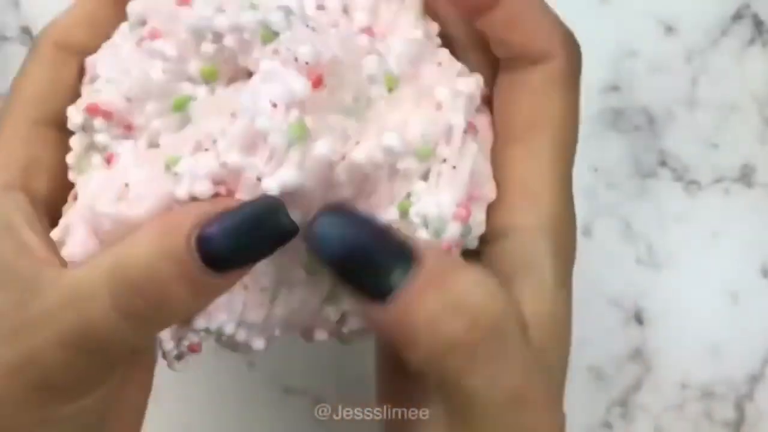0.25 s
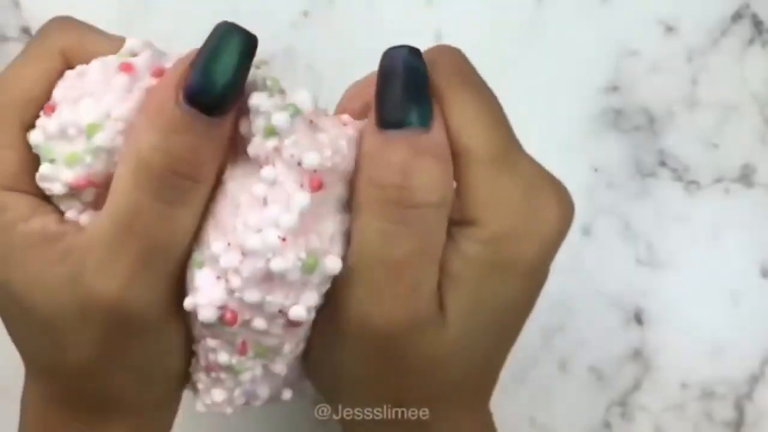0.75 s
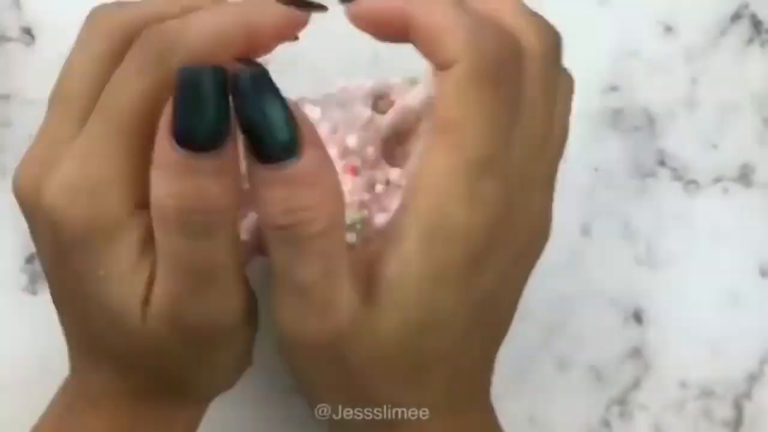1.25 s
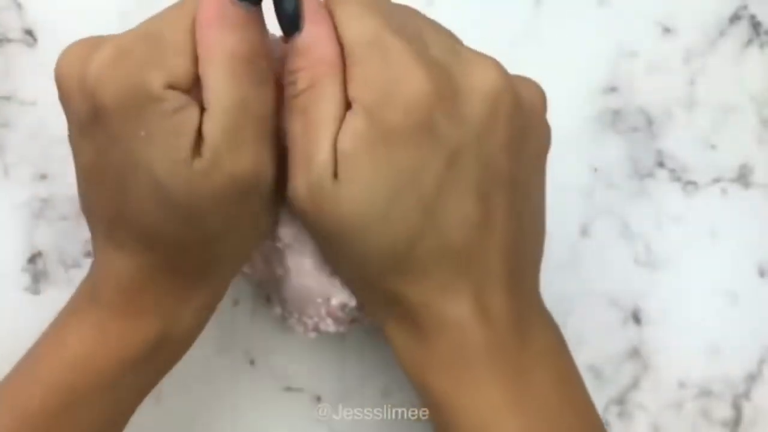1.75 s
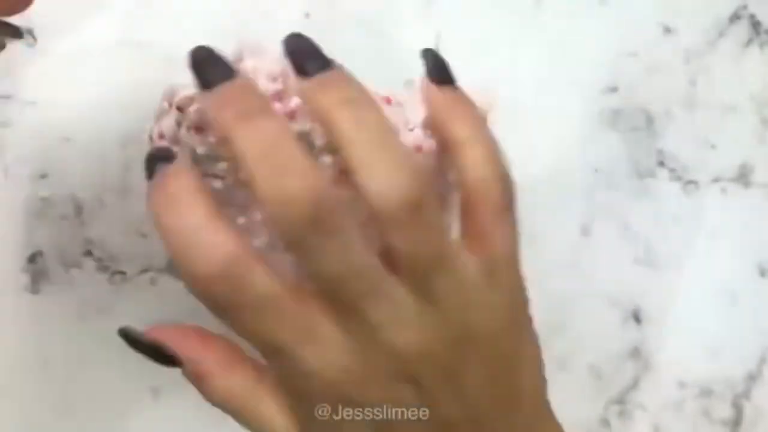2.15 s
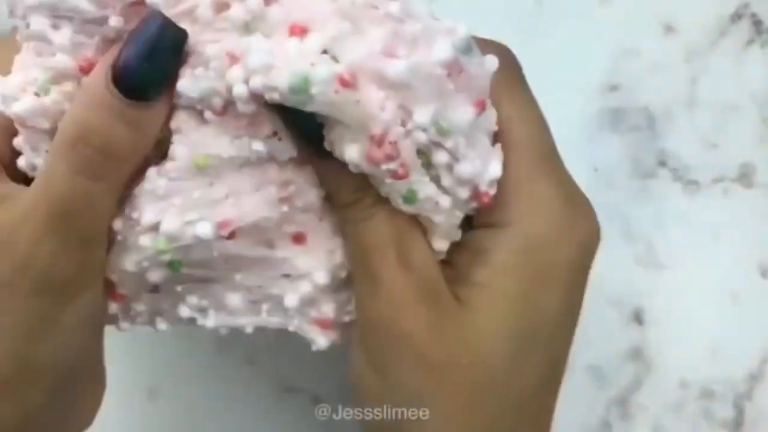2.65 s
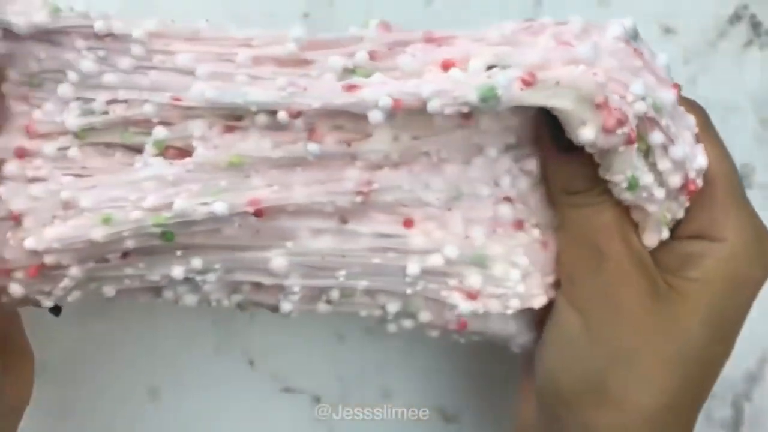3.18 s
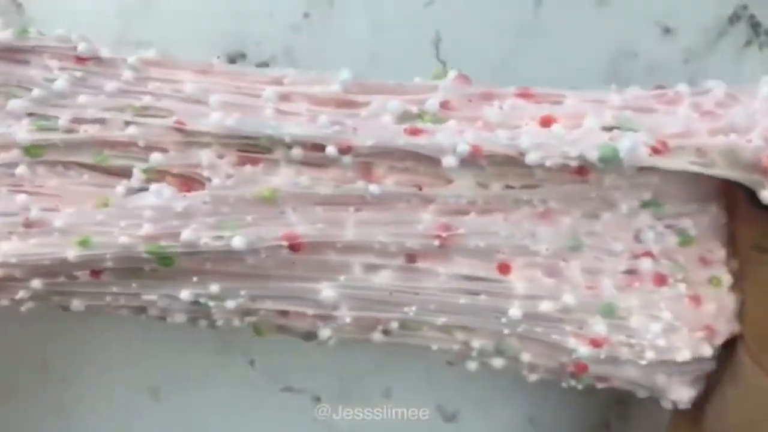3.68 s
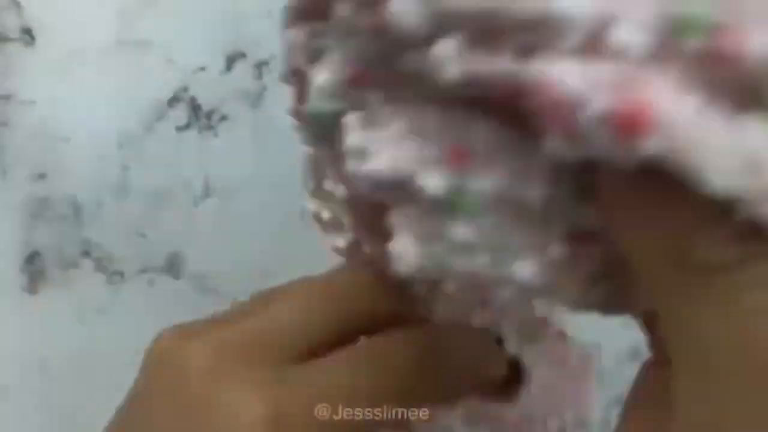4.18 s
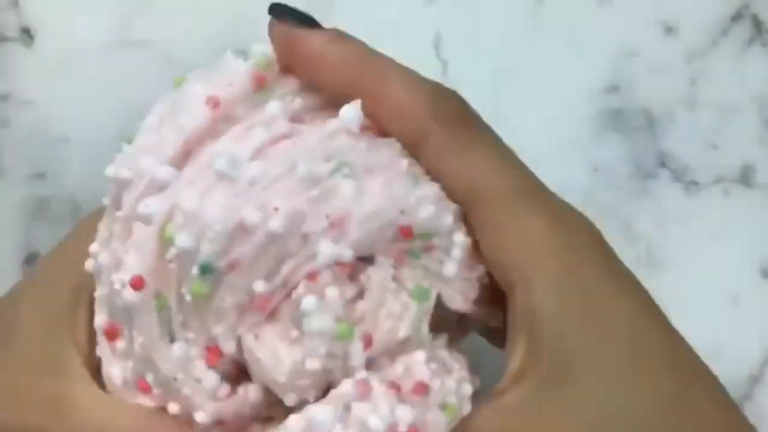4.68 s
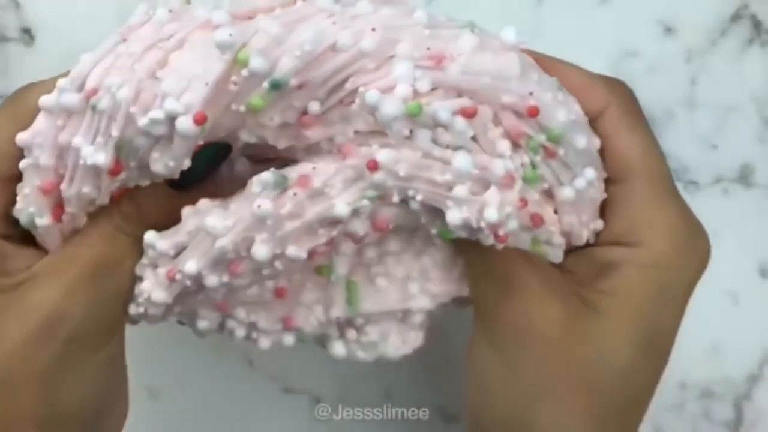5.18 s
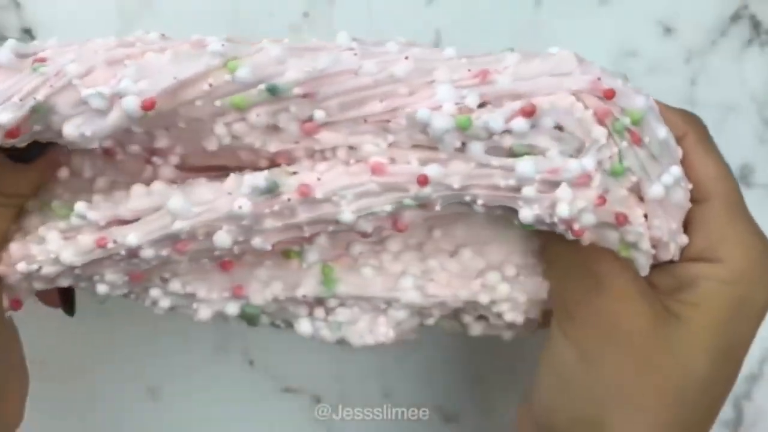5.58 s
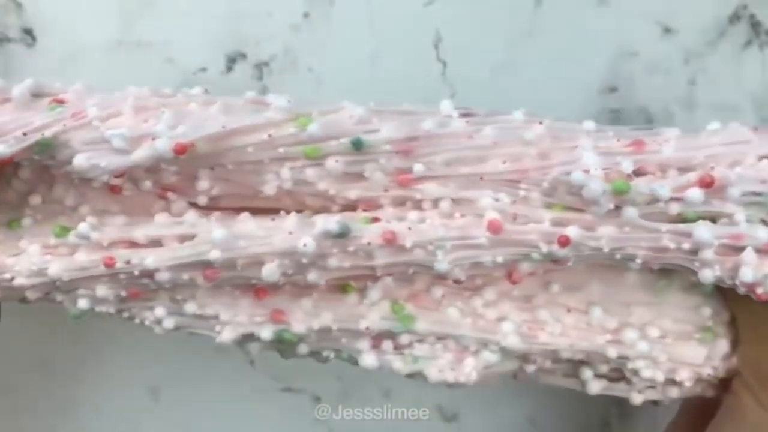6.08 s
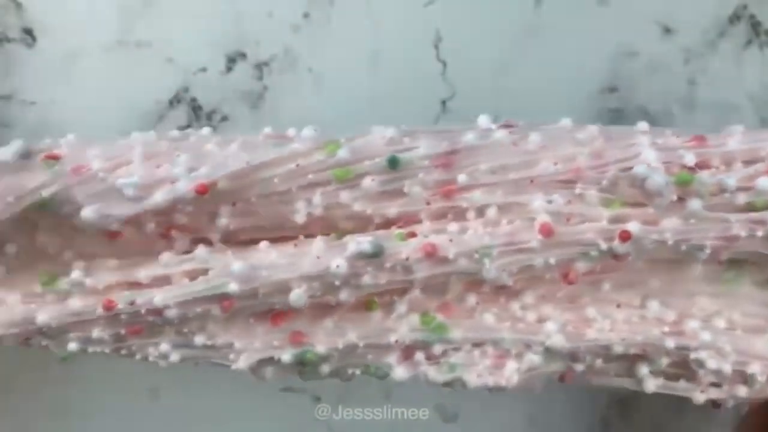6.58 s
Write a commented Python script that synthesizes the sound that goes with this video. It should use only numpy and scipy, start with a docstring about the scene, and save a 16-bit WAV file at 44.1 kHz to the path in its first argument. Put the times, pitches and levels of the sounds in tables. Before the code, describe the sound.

Hands squeeze and stretch bead-filled slime close up: sharp crunchy pops, dense fine crackling and wet squelches, in a quiet room with faint rumble.

```python
"""Squeezing beaded slime

Two hands squeeze, fold and stretch slime full of small foam beads close to a microphone.
Air pockets burst: a pitched crack, a short tearing of lumpy noise and a hollow pop of rising pitch.
Between them, many tiny ringing grains and filtered noise make crackle, squelch and the hands' push.
A hard table and a quiet room answer the bursts; one soft thud, low rumble and faint hiss join in."""
import sys
import numpy as np
from scipy import signal
from scipy.fft import rfft, irfft
from scipy.io import wavfile
from scipy.ndimage import uniform_filter1d

SR = 44100
rng = np.random.default_rng(int(sys.argv[2]) if len(sys.argv) > 2 else 0)


def inscribe(sig):
    """Save sig as 16-bit PCM at rate SR to the path in sys.argv[1].

    A 1-D sig is mono; a 2-D sig holds one channel per row.
    Samples are clipped to [-1, 1] before scaling.
    """
    pcm = np.round(np.clip(np.atleast_2d(sig).T, -1, 1) * 32767)
    wavfile.write(sys.argv[1], SR, pcm.astype(np.int16))


N = 301644   # length in samples


def from_db(db):
    """Decibels to gain."""
    return 10 ** (np.asarray(db) / 20)


def rms_one(x):
    """Scale to an rms (average strength) of one."""
    return x / np.sqrt(np.mean(x ** 2, axis=-1, keepdims=True) + 1e-20)


def dying(t, t60):
    """Exponential decay, 60 dB down at t60."""
    return from_db(-60 * t / t60)


def colour(x, spectrum):
    """Filter without pre-echo (minimum phase), its gain drawn as f/Hz, level/dB points."""
    hz, db = np.transpose(spectrum)
    grid = np.maximum(np.fft.rfftfreq(8192, 1 / SR), 1)
    gain_db = np.interp(np.log(grid), np.log(hz), db)
    # folding the cepstrum to positive times puts the whole response after the input
    cepstrum = irfft(np.log(from_db(gain_db)))
    cepstrum[1:4096] *= 2
    cepstrum[4097:] = 0
    response = irfft(np.exp(rfft(cepstrum)))
    return signal.fftconvolve(x, response)[:N]


def noise(spectrum):
    """Steady coloured noise with an rms of one."""
    return rms_one(colour(rng.standard_normal(N), spectrum))


def drift(rate):
    """Slow random wander with an rms of one; a higher rate in Hz wanders faster."""
    r = np.exp(-2 * np.pi * rate / SR)
    wander = signal.lfilter([1], [1, -2 * r, r * r], rng.standard_normal(N + SR))
    return rms_one(wander[SR:])   # the first second lets the filter settle


def grains(per_s, spread_db, low_hz, high_hz, cycles):
    """Random snaps of uneven size, in clumps, each ringing a few cycles at one of 16 pitches."""
    sizes = from_db(spread_db * np.minimum(rng.exponential(1, N), 4.0)) * rng.choice([-1, 1], N)
    clumped_rate = per_s * from_db(4.0 * drift(40.))
    clicks = sizes * (rng.random(N) < clumped_rate / SR)
    dealt, out = rng.integers(0, 16, N), 0
    for k, hz in enumerate(np.geomspace(low_hz, high_hz, 16)):
        r, w = from_db(-60 * hz / cycles / SR), 2 * np.pi * hz / SR
        ring = signal.lfilter([np.sin(w)], [1, -2 * r * np.cos(w), r * r], clicks * (dealt == k) + 1e-18)
        out = out + np.sqrt(1 - r * r) * ring
    return rms_one(out)


# Tone of the building's rumble: columns [f/Hz, level/dB]
RUMBLE_TONE = [(13, -60), (22, -20), (36, -5), (53, 4), (67, 0), (81, -7), (146, -9.5), (258, -14),
               (288, -14), (318, -17), (600, -38.5), (780, -48), (1320, -120)]
# Tone of the hiss: columns [f/Hz, level/dB]
HISS_TONE = [(300, -25.5), (600, 15), (2000, 1.5), (8000, -43), (13400, -16), (14300, -45)]
RUMBLE_DB, HISS_DB = -41.5, -59.5   # rms levels before the overall tone


def background():
    """Low rumble of the building and a faint hiss, both steady coloured noise."""
    rumble = from_db(RUMBLE_DB) * noise(RUMBLE_TONE)
    hiss = from_db(HISS_DB) * noise(HISS_TONE)
    return rumble + hiss


# Kneading effort: columns [t/s, fine crackle level/dB, wet squelch level/dB]
KNEADING_EFFORT = [(0,-42.5,-43),(.06,-62,-64),(.11,-54,-53),(.17,-52.5,-56),(.4,-41,-47),(.53,-49,-57),(.61,-36.5,-49),(.7,-49,-51),(.74,-37.5,-41),(.86,-27.5,-37),(.99,-29,-44),(1.07,-54,-45),(1.29,-41,-39.5),(1.35,-46.5,-47.5),(1.52,-56,-55),(1.58,-41,-40),(1.7,-28.5,-39),(1.75,-36,-36),(1.79,-42,-35.5),(1.83,-41,-42),(1.88,-35.5,-42.5),(2.03,-48.5,-53),(2.25,-56,-56),(2.4,-54,-73),(2.48,-45.5,-44),(2.67,-41,-47.5),(2.76,-36,-45),(2.84,-41,-45.5),(2.98,-36,-42),(3.24,-42.5,-46),(3.38,-37,-40),(3.45,-41.5,-48),(3.68,-39,-46.5),(3.799,-44,-50),(4.08,-39,-45.5),(4.13,-46.5,-57),(4.45,-50.5,-51.5),(4.62,-39.5,-44),(4.76,-53,-53.5),(4.96,-36.5,-40),(5.13,-32.5,-34),(5.31,-38.5,-42),(5.49,-37.5,-40),(5.9,-43,-47.5),(6.27,-45,-42.5),(6.63,-47.5,-54),(6.68,-57,-61),(6.76,-59,-67),(6.84,-45,-48.5)]


def effort(s):
    """Crackle and squelch levels in dB at the given times, on straight lines between the points."""
    at, *columns = np.transpose(KNEADING_EFFORT)
    return [np.interp(s, at, c) for c in columns]


# Tone of the kneaded lump: columns [f/Hz, level/dB]
LUMP_TONE = [(350, -18.5), (550, -4), (1050, -0.5), (1300, -3), (1500, -4.5), (1650, -2.5), (2300, -2.5),
             (3200, -10)]
# Tone of the stretched strands: columns [f/Hz, level/dB]
STRAND_TONE = [(350, -21), (600, -10.5), (1050, -5.5), (1350, 1), (1650, -4.5), (2300, -1), (3200, -8.5)]
STRETCH_FROM_S = 2.7   # from here the slime is pulled into strands, whose squelch rings hollow


def wet(x):
    """Tone of the wet mass: a kneaded lump first, stretched strands later."""
    stretched = np.arange(N) / SR > STRETCH_FROM_S
    return np.where(stretched, rms_one(colour(x, STRAND_TONE)), rms_one(colour(x, LUMP_TONE)))


# Tone of the fine crackle: columns [f/Hz, level/dB]
CRACKLE_TONE = [(1500, -20), (2400, -8), (3600, 2), (5200, 2.5), (8700, 4.5), (11000, 0.5), (13400, 2.5),
                (14000, -37), (14500, -46)]
# Tone of the pushing hands: columns [f/Hz, level/dB]
PUSH_TONE = [(80, -27), (160, 0), (260, -2.5), (450, -7.5), (800, -18)]
GRAINY = 0.49   # share of crackle and squelch power in separate grains, the rest is smooth
LULL_DB, LULLS_HZ = 2., 13.5   # the crackle comes in clusters: rms swing, wander rate
PUSH_DB, PUSH_FOLLOWS = -51, 0.15   # push at mean effort; dB per dB of the crackle's swing
PUSH_WANDER_DB = 3.   # rms swing as the grip shifts slowly


def kneading():
    """Crackle of small films over smooth fizz, duller squelch of the wet mass, low push of the hands."""
    crackle_db, squelch_db = effort(np.arange(N) / SR)
    slide_fizz, slide_ooze, slide_push = sliding()
    snaps = rms_one(colour(grains(900., 5.4, 1950.0, 12300.0, 5.3), CRACKLE_TONE))
    fizz = noise(CRACKLE_TONE) * from_db(0.99 * drift(38.0))
    bubbles = wet(grains(700., 1.8, 343.0, 2790.0, 9.2))
    ooze = wet(rng.standard_normal(N))
    push = noise(PUSH_TONE)
    crackle, squelch = from_db([crackle_db, squelch_db] + LULL_DB * drift(LULLS_HZ))
    grain = np.sqrt(GRAINY) * (crackle * snaps + squelch * bubbles)
    # independent noises add by power, so gains are squared before they are summed
    fizz = fizz * np.sqrt((1 - GRAINY) * crackle ** 2 + slide_fizz ** 2 + after_fizz() ** 2)
    ooze = ooze * np.sqrt((1 - GRAINY) * squelch ** 2 + slide_ooze ** 2)
    effort_swing_db = crackle_db - crackle_db.mean()
    push_db = PUSH_DB + PUSH_FOLLOWS * effort_swing_db + PUSH_WANDER_DB * drift(2.8)
    push = push * (from_db(push_db) + slide_push)
    return grain + fizz + ooze + push


# Palms sliding over the mass: columns
# [full strength from t/s, swell t/s, hold t/s, fizz level/dB, ooze level/dB, push level/dB]
PALM_SLIDES = [(0.06,0.039,0.09,-65,-65,-51.5),(0.295,0.022,0.032,-34,-37,-43),(1.206,0.067,0.03,-25.5,-36.5,-32),(2.099,.03,0.098,-30,-36,-32),(2.97,0.086,0.11,-41,-50,-45),(4.212,0.12,.02,-39.5,-40.5,-53)]


def sliding():
    """Fizz, ooze and push gains of the sliding palms: swell, hold, then fall as long as the swell."""
    t, out = np.arange(N) / SR, 0
    for s, swell, hold, *db in PALM_SLIDES:
        shape = np.interp(t, [s - swell, s, s + hold, s + hold + swell], [0, 1, 1, 0])
        out = out + from_db(db)[:, None] * shape
    return out


RANDOM_PER_S, RANDOM_SPREAD_DB = 55., 4   # mean rate; spread of crack and cavity levels either way
RANDOM_OVER_DB, RANDOM_CAVITY_DB = 10.5, 3   # crack setting over the crackle, cavity over the squelch
RANDOM_CRACK_HZ, RANDOM_CAVITY_HZ = 6800, 1400   # middle pitches
RANDOM_TEAR_DB = -13.5   # middle tearing setting against the crack


def random_pops():
    """More pockets burst at random times throughout, following the kneading effort."""
    chance = rng.uniform(-1, 1, (500, 5))
    s = .01 + np.cumsum(rng.exponential(1, 500)) / RANDOM_PER_S
    crackle_db, squelch_db = effort(s)
    crack_db = crackle_db + RANDOM_OVER_DB + RANDOM_SPREAD_DB * chance[:, 0]
    crack_hz = RANDOM_CRACK_HZ * 2 ** (0.32 * chance[:, 1])
    tear_db = RANDOM_TEAR_DB + 8.5 * chance[:, 2]
    cavity_hz = RANDOM_CAVITY_HZ * 2 ** (1.37 * chance[:, 3] ** 3)
    cavity_db = squelch_db + RANDOM_CAVITY_DB + RANDOM_SPREAD_DB * chance[:, 4]
    rows = [s, crack_db, crack_hz, tear_db, cavity_hz, cavity_db]
    return np.transpose(rows)[s < N / SR]


# Bursting pockets placed one by one, faint to loud, levels before the trims in pops(): columns
# [t/s, crack level/dB, crack f/Hz, tearing against crack level/dB, cavity starting f/Hz, cavity level/dB]
PLACED_POPS = [(0.0536,-23.5,6960,-17,272,-53),(.1176,-23,6400,-17,340,-49),(.1213,-21,8700,-28,293,-53),(0.1536,-8.5,10500,-29,3350,-44),(.1913,-14,8700,-22,470,-59),(0.2138,-2,5700,-14.5,3760,-27),(.2237,-22,6900,-30,1060,-28.5),(.288,-21,5600,-11,1670,-31.5),(.3416,-8.5,8000,-24,714,-56),(.382,-18,6200,-5,3580,-47),(0.3916,-4,7400,-22,730,-38),(0.4059,-0.5,8700,-16,614,-38),(0.4235,-6,8550,-33,560,-41),(0.4742,-20.5,7000,-9.5,250,-47),(.4661,-24,7300,-26,770,-55),(0.5271,-16.5,7500,-12,980,-36),(.551,-23.5,4950,-6.5,955,-26),(.56,-26,7100,-6,350,-47),(0.621,-32,4800,-20,3580,-33),(0.6698,0.5,6230,-19,2600,-30),(0.7103,-8.5,8600,-17,2900,-28),(.713,-21,5500,-10,700,-29.5),(.745,-10,5470,-6,920,-22.5),(.772,-19,7000,-22,1110,-41),(0.7849,-1,5150,-9,550,-25),(0.793,-9,7600,-24,980,-34),(.8125,-14,6600,-17,2230,-29),(0.8235,-6,5460,-7.5,920,-32),(0.839,1,5860,-13.5,3540,-28),(.8469,1.5,6800,-20,3590,-28),(0.8565,7,6300,-16,3740,-23),(.86,3.5,6200,-10,1026,-5),(.8667,-10,4280,-15,1460,-29),(.8765,2.5,9400,-19,950,-41),(.8969,-9,6800,-21,960,-40),(.902,-6,7400,-28,350,-33),(0.9089,-11,6700,-4.5,900,-30),(0.9261,7.5,9000,-15,2490,-41),(0.9386,-9,8150,-10,794,-23),(0.9418,0.5,8400,-5,1170,-33),(.962,-6,8850,-21,1300,-35),(0.968,-5.5,5000,-9.5,744,-17.5),(.9772,-15,5700,-20,940,-31),(0.9869,-1.5,7150,-2.5,900,-21),(0.9975,-10,7100,-16,1140,-37),(1.0131,-23,5000,-20,900,-16.5),(1.0179,-2,7300,-5,625,-19),(1.054,-14.5,7300,-5,1360,-26.5),(1.0651,-4,8600,-21,1070,-44),(1.091,5,8260,-9,497,-19),(1.17,-10,7500,-20,545,-30),(1.2906,-15.5,4300,-14,715,-32.5),(1.3033,-22,7000,-8,387,-37),(1.342,-25.5,5870,-24,770,-45),(1.4566,-4.5,8500,-17.5,3620,-24),(1.477,-24,7000,-9,256,-42),(1.5353,-29,5500,-19.5,1320,-30),(1.551,-20,4600,-17,1160,-25),(1.555,-17,8600,-11,720,-40),(1.5658,-6.5,7650,-13,1170,-9),(1.5763,-2,8100,-7.5,2600,-26),(1.5981,-13,5500,-17,2610,-19),(1.61,-3,6400,-11,2820,-26),(1.6402,-9.5,7200,-6,1090,-34),(1.6487,-11,7100,-15,1200,-43),(1.6522,-21,7600,-20,660,-31.5),(1.6727,2,7200,-15,1000,-39),(1.7035,1,7000,-10,900,-19),(1.7072,-6.5,7100,-4.5,1270,-22),(1.7171,-26,7100,-20,497,-22),(1.723,-9,7700,-23,550,-36),(1.7456,-18,6700,-16,684,-27),(1.7533,-10,7800,-12,680,-43),(1.7691,-19,7100,-20,416,-27),(1.7778,-18,7300,-8,470,-30),(1.798,-18,5800,-35,1960,-29),(1.8161,-8.5,7300,-25,850,-24),(1.8405,-10,6300,-18,640,-52),(1.8543,0,6200,-11,2110,-51),(1.875,-7,8200,-17,1070,-25),(1.895,-9,6640,-9,3060,-50),(1.9082,-10,8400,-26,370,-50),(1.9349,-18.5,6140,-4.5,2200,-25),(1.9541,-16,6400,-16.5,825,-37),(1.9866,-25.5,6200,-3,1170,-34),(2.06,-18.5,7000,-14,770,-42),(2.0832,-11.5,6800,-7,965,-23),(2.1304,-11.5,7200,-10.5,1260,-24),(2.1624,-11.5,6840,-8.5,794,-23),(2.199,-14.5,6400,-6,930,-39),(2.3686,-21.5,7760,-21,320,-44),(2.3938,-24.5,6540,-25,270,-64),(2.4637,-7,8500,-13.5,930,-34),(2.4787,-25,5900,-11,1810,-29),(2.5028,-15.5,8450,-28,442,-42),(2.5614,-38,4200,-17,3080,-21.5),(2.569,-22.5,5750,-3.5,640,-37),(2.632,-22,6960,-6,1040,-36),(2.6984,-21,7000,-8,2400,-43),(2.7026,-0.5,6340,-11,2360,-24),(2.7045,-3,7450,-12,3000,-33),(2.7051,-3,8600,-0.5,3430,-35),(2.796,-25.5,6700,-32,1320,-42),(2.8581,-27,6200,-18,1330,-45),(2.8683,-11,8800,-29,2670,-30),(2.9032,-8.5,7200,-40,1240,-25.5),(2.9068,-16.5,6660,-10,1070,-38),(2.9246,-19,6200,-24,1180,-42),(2.935,-16,6600,-25,1470,-35),(3.0263,-23,8000,-13,330,-48),(3.0814,-18.5,8400,-22,2640,-33),(3.092,-13,7560,-16,1270,-38),(3.1564,-14.5,2820,-13.5,1450,-26),(3.2013,-5,10400,-34,1210,-49),(3.2579,-18.5,7940,-19,350,-59),(3.2907,-2,7700,-16,1170,-32),(3.3297,-16,8600,-23,1650,-43),(3.3513,-23,5800,-15,3430,-31),(3.3802,-20,8600,-15,850,-46),(3.419,-39,8000,-11,1520,-30),(3.4327,-21.5,5500,-30,3040,-41),(3.46,-23,6200,-21,1500,-51),(3.472,-18,6030,-21,710,-54),(3.537,-16.5,7940,-21,250,-73),(3.5704,-9.5,5170,-17,1420,-37),(3.6585,-15.5,6400,-27,2130,-28),(3.6862,-20,6700,-3.5,1320,-36),(3.7681,-15,6060,-23,865,-39),(3.7912,-17.5,5500,-12,2050,-41),(3.9132,-11,7050,-20,3450,-38),(3.925,-24,5400,-11,1540,-25.5),(3.9866,-22.5,7600,-14,2200,-50),(3.9963,-20,7000,-18,240,-51),(4.0322,-21,5430,-34,2030,-34),(4.075,-15.5,7300,-8,1030,-32),(4.3616,-14,2200,-18,1400,-15.5),(4.362,-13,6000,-15,2580,-30),(4.5247,-7,7040,-15,1350,-19.5),(4.551,-34,6600,-20,874,-31.5),(4.562,-19.5,7300,-21,1790,-37),(4.6103,-23,6300,-6,427,-38.5),(4.6201,-13,8340,-16,2380,-30),(4.692,-21.5,8100,-6.5,1080,-36.5),(4.7541,-27,7300,-9,238,-53),(4.773,-46,6200,-20,1880,-31.5),(4.871,-23,7300,-20,290,-51),(4.8903,-18,7800,-19,1370,-36),(4.9502,-21,5500,-19,855,-29.5),(4.9598,-15,8400,-13,960,-33),(4.979,-13.5,5500,-24,1100,-33),(4.9947,-21,4600,-21,1220,-36),(5.0208,-7,8300,-9,1150,-31),(5.035,-10.5,8150,-12,1050,-43),(5.0824,-3.5,7800,-18,725,-21.5),(5.0905,-6,6500,-17,3190,-24),(5.103,-10,6700,-21,840,-23),(5.1116,-22,6900,-26,1260,-20),(5.123,-4,7760,-32,1410,-37),(5.129,-1.5,8300,-19,870,-43),(5.1466,-16.5,5540,-5.5,2600,-14),(5.2297,-14.5,8300,-14,1210,-32),(5.2457,-15.5,8000,-17,2330,-44),(5.293,-13.5,7900,-13,2830,-41),(5.375,-16,9200,-12,1210,-40),(5.391,-14,7150,-9.5,1390,-31),(5.4385,-15.5,5400,-24,3300,-23),(5.453,-16,7500,-10,1410,-40),(5.5044,-17,5600,-22,1420,-38),(5.5523,-22,4600,-26,2270,-26),(5.5603,-27.5,4900,-8,2900,-25),(5.586,-37,5700,-20,1350,-33),(5.6012,-19.5,7240,-7,250,-58),(5.656,-18,6660,-23,1400,-34),(5.7236,-13,7860,-21,1410,-32),(5.805,-12.5,6400,-15,2740,-19),(5.8156,-30,6600,-20,1970,-23.5),(5.8585,-31,4700,-28,1140,-31),(5.875,-16,8400,-24,1270,-44),(5.9007,-13,9000,-23,240,-49),(6.0126,-25,7400,-13,2210,-35),(6.0932,-34,6100,-28.5,2420,-28.5),(6.103,-22.5,5600,-24.5,2410,-48.5),(6.1582,-20,5140,-27,2300,-36),(6.1775,-24,7400,-16,1890,-30),(6.2705,-29,5700,-18,1150,-30),(6.2908,-22,5700,-20,1200,-30),(6.3114,-39,6300,-20,1200,-28.5),(6.3719,-27.5,8250,-9,2890,-34),(6.469,-4.5,7500,-13.5,2440,-19.5),(6.486,-22,7800,-27,1280,-38),(6.6485,-30,6140,-15,1380,-31),(6.7464,-28,7850,-31,247,-46)]


def pops():
    """Each burst: the film strains, cracks sharply, tears raggedly, and the cavity rings."""
    columns = np.vstack([PLACED_POPS, random_pops()]).T[:, :, None]
    s, crack_db, crack_hz, tear_db, cavity_hz, cavity_db = columns
    lead = 128   # samples kept before the crack
    since = (np.arange(1024) - lead) / SR
    t = np.maximum(since, 0)
    chance = rng.standard_normal((len(s), 2, 1024))
    sign = np.sign(chance[:, 1, :1])
    # the rupture: rises within half a cycle, rings down in a few
    cycles = since * crack_hz
    shape = np.where(cycles < 0, np.exp(-(cycles / .45) ** 2), dying(np.abs(cycles), 6.0))
    tones = np.sin(2 * np.pi * cycles) + from_db(-10.5) * np.sin(3.4 * np.pi * cycles)
    crack = sign * tones * shape
    # tearing: broad noise centred on the crack pitch, coming in lumps as the film lets go
    hz = np.maximum(np.fft.rfftfreq(1024, 1 / SR), 1)
    octaves = np.log2(hz / crack_hz)
    broad = rms_one(irfft(rfft(chance[:, 0]) / (1 + (octaves / 0.86) ** 2 + (octaves / 3.0) ** 4)))
    lumps = from_db(3.0 * rms_one(uniform_filter1d(chance[:, 1], size=30)))
    strain = from_db(6.5) * dying(t - since, 0.0065) * (since < 0)   # grows up to the crack
    tear = broad * lumps * (strain + dying(t, 0.016) * (1 - dying(t, 0.0025)))
    # the cavity shrinks as it empties, so its pitch climbs a little
    phase = 2 * np.pi * cavity_hz * t * (1 + 16.0 * t)
    modes = np.sin(phase) + from_db(-9.5) * np.sin(1.57 * phase)   # an uneven pocket has a second mode
    cavity = sign * modes * dying(t * cavity_hz, 7.5) * (1 - dying(t * cavity_hz, 0.71))
    film = from_db(4) * crack + from_db(tear_db + 1) * tear
    bursts = from_db(crack_db) * film + from_db(cavity_db + 7.5) * cavity
    out = np.zeros(N + 1024)
    np.add.at(out, np.round(s * SR).astype(int) - lead + np.arange(1024), bursts)
    return out[:N]


AFTER_FIZZ_DB, AFTER_FIZZ_T60_S = -19.5, 0.31   # gain where crack and tearing dB sum to 0; decay
AFTER_FIZZ_FOLLOWS = 1.55   # dB per dB of tearing


def after_fizz():
    """Gain of the fizz with which a torn film dies away after each placed burst."""
    s, crack_db, _, tear_db, *_ = np.transpose(PLACED_POPS)
    power = np.zeros(N)
    power[(s * SR).astype(int)] = from_db(AFTER_FIZZ_FOLLOWS * (crack_db + tear_db) + AFTER_FIZZ_DB) ** 2
    # power falls twice as fast in dB as gain, hence the 2
    return np.sqrt(signal.lfilter([1], [1, -dying(2 / SR, AFTER_FIZZ_T60_S)], power + 1e-18))


ROOM_T60_S, ROOM_DB = 0.13, -10.5   # decay; strength of the whole tail


def room(x):
    """A short diffuse tail from the table and walls, made of dying noise."""
    t = np.arange(SR // 2) / SR
    tail = rng.standard_normal(len(t)) * dying(t, ROOM_T60_S) * (1 - dying(t, 0.0028))
    answer = from_db(ROOM_DB) * tail / np.sqrt(np.sum(tail ** 2))
    return signal.fftconvolve(x, answer)[:N]


# The lump meets the table: columns [t/s, level before swell and decay/dB, f/Hz, decay t60/s]
TABLE_THUDS = [(2.09, -9, 89, 0.058)]


def thud():
    """A soft low bump: a sine that swells for about half a cycle and dies at once."""
    out = 0
    for s, level_db, hz, t60 in TABLE_THUDS:
        t = np.maximum(np.arange(N) / SR - s, 0)
        swell = 1 - dying(t, 0.04)
        out = out - from_db(level_db) * np.sin(2 * np.pi * hz * t) * dying(t, t60) * swell
    return out


def scene():
    """Slime bursts in the room, with kneading, thud and background added dry."""
    bursts = pops()
    return (bursts + room(bursts) + kneading() + thud() + background())[None]


# Overall tone, with a steep drop near 14 kHz: columns [f/Hz, level/dB]
OVERALL_TONE = [(20, -6), (40, -6.5), (1000, -5), (1400, -3), (1750, -3.5), (3000, 0.5), (6500, -2.5),
                (9000, -1.5), (10500, -4.5), (13500, -5), (14300, -42), (16000, -24)]
CUTOFF_HZ = 16300   # from here up the sound is at least 80 dB down


def record(dry):
    """Overall colour, overload clipped at full scale, then the top cut."""
    heard = np.clip(colour(dry[0], OVERALL_TONE), -1, 1)
    top_cut = signal.cheby2(14, 80, CUTOFF_HZ, fs=SR, output="sos")
    return signal.sosfilt(top_cut, heard)[None]


dry = scene()
out = record(dry)
inscribe(out)
```